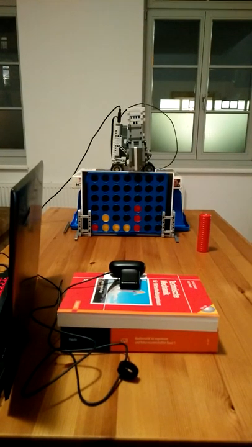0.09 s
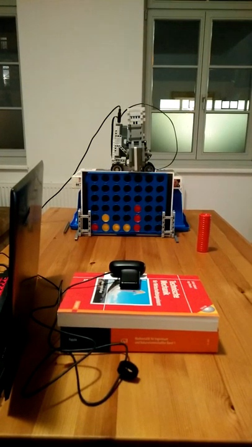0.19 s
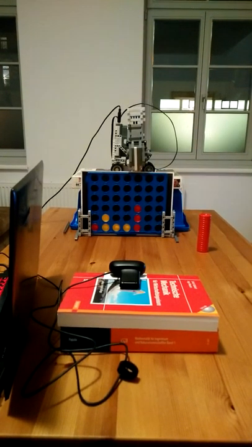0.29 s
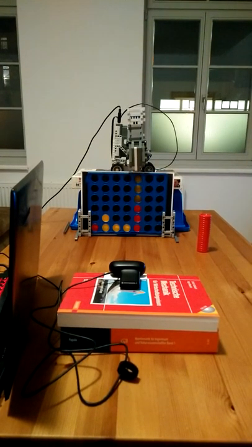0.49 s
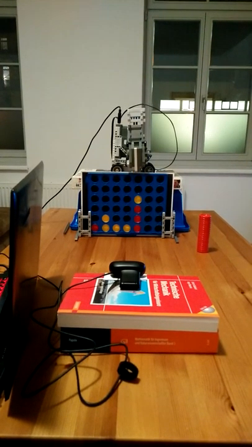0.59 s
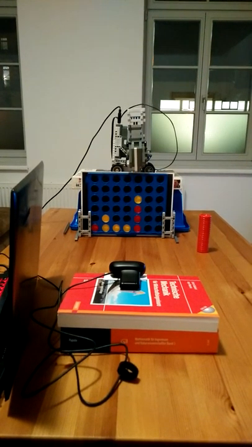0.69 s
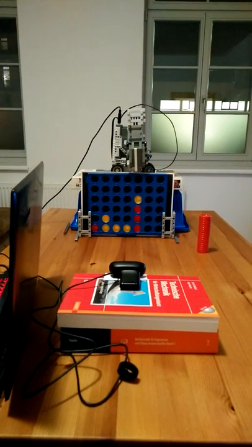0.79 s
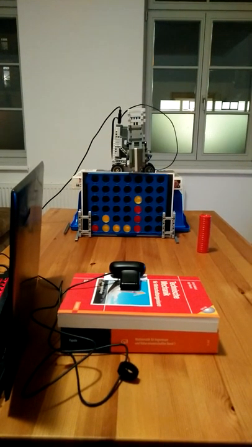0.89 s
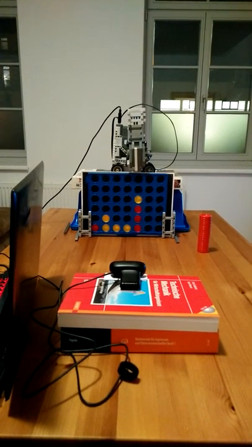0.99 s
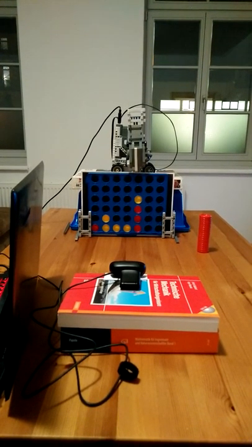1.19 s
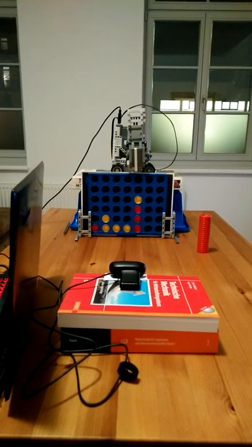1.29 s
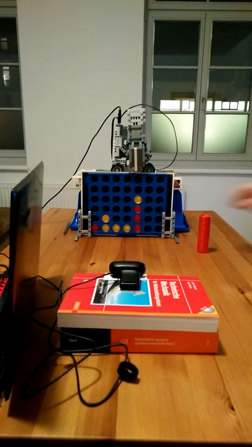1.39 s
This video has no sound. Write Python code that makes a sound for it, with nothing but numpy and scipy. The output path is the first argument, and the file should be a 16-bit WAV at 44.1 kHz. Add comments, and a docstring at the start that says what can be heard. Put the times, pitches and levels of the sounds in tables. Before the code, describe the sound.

A small motorized mechanism whirs and rattles, pushing a plastic disc into a game grid on a wooden table. The disc slides down and lands with a sharp clack. After a pause the motor runs back, in a lightly echoing room.

```python
"""A geared motor whirs up over the faint rumble of a bare, lively room: a small robot on a wooden table
is playing a plastic disc into an upright game grid. A pusher snaps against the disc, which rattles in
the chute, scrapes down a column, clacks onto the stack and bounces. Then the motor runs back.
Each impact is a sum of damped modes, most with a burst of contact noise; gears and scraping are random
impulses filtered by the plastic. The table hums and thuds below, and the room adds its reverberation."""
import sys
import numpy as np
from scipy import signal
from scipy.fft import rfft, irfft, next_fast_len
from scipy.io import wavfile
from scipy.ndimage import uniform_filter1d, minimum_filter1d, map_coordinates

SR = 44100
rng = np.random.default_rng(int(sys.argv[2]) if len(sys.argv) > 2 else 0)


def pcm_store(signal):
    """Save signal as 16-bit PCM."""
    levels = np.round(np.clip(np.atleast_2d(signal), -1, 1) * 32767)
    wavfile.write(sys.argv[1], SR, levels.astype(np.int16).T)


N = 63945

# spectrum of the room's background noise (f/Hz, level/dB)
AMBIENT_SPECTRUM = [(25, -22.5), (55, -19), (88, -1.5), (130, -17), (205, -8), (400, -18), (1000, -23),
                    (4000, -37), (10000, -34)]
# envelopes of the gear train on the push and on the way back (t/s, level/dB)
PUSH_ENVELOPE = [(.155, -83), (.168, -61.5), (.2, -46), (.222, -34.5), (.24, -32), (.33, -31), (.39, -36),
                 (.44, -35.5), (.48, -60), (.52, -80)]
RETURN_ENVELOPE = [(1.155, -72), (1.172, -64), (1.186, -51.5), (1.2, -45), (1.222, -39), (1.262, -40),
                   (1.295, -39.5), (1.335, -49.5), (1.395, -45), (1.43, -49), (1.45, -56)]
# frequency response of the gear housing (f/Hz, level/dB)
HOUSING_RESPONSE = [(30, -49), (110, -18.5), (260, -17.5), (480, -29.5), (780, -17.5), (1000, -20.5),
                    (1400, -8), (2200, -2.5), (3100, -4.5), (3900, -5), (4600, -3.5), (6400, -7.5),
                    (7400, -14), (8100, -39), (8700, -22.5), (9600, -40.5), (10500, -63)]
# envelope of the motor's hum in the table (t/s, level/dB)
HUM_ENVELOPE = [(.16, -91), (.23, -52.5), (.27, -54.5), (.4, -59), (.47, -54), (.53, -86.5), (1.16, -84.5),
                (1.22, -61), (1.285, -57), (1.325, -48), (1.37, -62), (1.45, -85)]
# impacts of the disc on the chute (t/s, level/dB)
CHUTE_IMPACTS = [(.2023, -30.5), (.2327, -11), (.2395, -19.5), (.247, -17.5), (.2595, -18), (.2731, -12.5),
                 (.2835, -19.5), (.2986, -16.5), (.303, -22.5), (.309, -23.5), (.329, -28), (.3595, -14),
                 (.366, -19.5), (.3815, -18), (.4014, -20), (.406, -18), (.4263, -5), (.4311, -6.5),
                 (.4425, -17), (.461, -31), (.5093, -21), (.552, -23), (.561, -19.5)]
# frequency response of the grid's plastic (f/Hz, level/dB)
PLASTIC_RESPONSE = [(30, -33), (100, -18.5), (200, -6.5), (300, -8), (520, -13), (760, -3.5), (1400, -1.5),
                    (1900, 4.5), (2800, -9), (3800, 1.5), (5200, 4), (6400, 1), (7300, -1), (8050, -42.5),
                    (8600, -12), (9600, -20), (10600, -39.5)]
# impacts of the pusher on the disc (t/s, knock level/dB, snap level/dB)
PUSHER_IMPACTS = [(.2025, -55, -18), (.2295, -19.5, -20.5), (0.2302, -16.5, -3), (.248, -25, -17),
                  (.2965, -14, -13.5), (.3095, -27, -24.5), (.3305, -14, -19.5), (.363, -13, -14),
                  (.4425, -14.5, -38.5)]
# envelope of the table's shudder (t/s, level/dB)
SHUDDER_ENVELOPE = [(.21, -92), (.25, -50.5), (.31, -52), (.38, -61.5), (.45, -60), (.55, -60),
                    (.64, -69.5), (.69, -58.5), (.8, -70.5), (.9, -81)]
# frequency response of the table (f/Hz, level/dB)
TABLE_RESPONSE = [(25, -29), (55, -22), (90, -6), (135, -7), (200, -3.5), (400, -34.5), (1500, -71.5)]
# envelope of the disc's scraping in the column (t/s, level/dB)
SCRAPE_ENVELOPE = [(.43, -74.5), (.445, -28), (.48, -55.5), (.549, -34.5), (.555, -28.5), (.585, -36.5),
                   (.62, -45), (.66, -47.5), (.67, -88)]
# the disc entering the grid, landing and bouncing (t/s, disc level/dB, grid level/dB)
LANDINGS = [(0.4431, -41, -26.5), (0.6628, 0.5, -7.5), (0.6661, -4.5, -8.5), (0.67, -15, -11.5),
            (0.6714, -17, -10), (0.6769, -17, -25), (0.7007, -7.5, -16.5), (0.706, -29, -20),
            (0.7264, -5.5, -13.5), (0.7524, -37, -20)]
# normal modes of the struck bodies (f/Hz, level/dB, T60/s)
DISC_MODES = [(2160, -17.5, .03), (4830, -25, .02), (6376, 3.5, 0.028), (6580, -8.5, 0.021),
              (9626, -28, 0.026)]
PUSHER_MODES = [(2128, 0.5, 0.031), (3540, -7.5, .014), (3814, 8, 0.012), (5020, 1, 0.0083)]
STACK_MODES = [(4940, -14.5, 0.03), (6030, -8, .032), (6063, -8.5, 0.03), (6358, -2, 0.022)]
GRID_MODES = [(770, -20.5, .018), (1100, -23.5, 0.045), (1914, -23.5, 0.15), (2150, -18.5, .035)]
TABLE_MODES = [(191, -1.5, 0.075), (342.6, -15.5, 0.034), (477.5, -14.5, 0.06)]
# reverberation time of the room (f/Hz, T60/s)
REVERB_TIME = [(80, 0.32), (200, 0.85), (450, 0.66), (800, 0.69), (2000, 0.7), (4000, 0.68), (6300, 0.5),
               (10000, 0.34)]
# left-right coherence of the reverberation (f/Hz, coherence/1)
REVERB_COHERENCE = [(100, .95), (250, 1), (600, 1), (1500, 0.43), (8000, .05)]
# level at the left ear relative to the right (f/Hz, level/dB)
LEFT_EAR_RESPONSE = [(60, -2.5), (150, -6.5), (500, -5), (1100, -10), (2200, -11.5), (4000, -7), (6300, -5),
                     (9000, -4)]
# frequency response of the microphone (f/Hz, level/dB)
MIC_RESPONSE = [(20, -21), (60, -0.5), (7400, -1.5), (8100, 0), (8600, 0.5), (9650, 5.5), (10200, -3.5),
                (10800, -15.5)]

TOOTH_TICKS_PER_S = 1200


def amp(db):
    """Amplitude ratio of a level in dB."""
    return 10 ** (np.asarray(db) / 20)


def unit(x):
    """x normalised to rms 1."""
    return x / np.sqrt(np.mean(x ** 2) + 1e-20)


def along(points, hz):
    """Interpolation of (f/Hz, value) points on a logarithmic frequency axis."""
    f, values = np.transpose(points)
    return np.interp(np.log(hz + 1), np.log(f + 1), values)


def envelope(rows):
    """Gain per sample from (t/s, level/dB) rows, silent outside them."""
    times, db = np.transpose(rows)
    return amp(np.interp(np.arange(N) / SR, times, db, left=-140, right=-140))


def wobble(rate):
    """Smooth random modulation: a spline through `rate` knots a second."""
    return map_coordinates(rng.standard_normal(2000), [np.arange(N) * rate / SR], mode="wrap")


def coloured(x, response):
    """Minimum-phase filtering by a (f/Hz, level/dB) response."""
    size = 2 * next_fast_len(N)
    cepstrum = irfft(np.log(amp(along(response, np.fft.rfftfreq(size, 1 / SR)))), size)
    cepstrum[1:size // 2] *= 2  # folding the cepstrum makes the filter causal
    cepstrum[size // 2 + 1:] = 0
    return irfft(rfft(x, size) * np.exp(rfft(cepstrum)), size)[..., :N]


def ring(at, modes, attack_s, detune):
    """Free vibration: damped modes struck at `at` seconds, their level and pitch varying at each blow."""
    t, out = np.arange(SR // 4) / SR, np.zeros(2 * N)
    onset = 1 - np.exp(-(t / attack_s) ** 2)
    for (hz, db, t60), (scatter_db, shift) in zip(modes, rng.standard_normal((len(modes), 2))):
        decay = amp(db + scatter_db - 60 * t / t60)
        tone = np.sin(2 * np.pi * hz * (1 + detune * shift) * t)
        out[round(at * SR):][:len(t)] += onset * decay * tone
    return out[:N]


def burst(at, t60):
    """Contact noise: a broadband transient decaying exponentially from `at` seconds."""
    t = np.maximum(np.arange(N) - round(at * SR), 0) / SR
    return (t > 0) * amp(-60 * t / t60) * rng.standard_normal(N)


def room_rumble():
    """Ambient noise: a faint, steady rumble, largely coherent between the ears."""
    noise = rng.standard_normal(N) + 0.48 * rng.standard_normal((2, N))
    return amp(-82) * unit(coloured(noise, AMBIENT_SPECTRUM))


def gear_whir():
    """Source and filter: uneven tooth impacts and friction noise excite the plastic housing."""
    chance, strength, friction = rng.random(N), rng.standard_normal(N), rng.standard_normal(N)
    teeth = unit((chance < TOOTH_TICKS_PER_S / SR) * amp(3.5 * strength) * np.sign(friction))
    whir = unit(coloured(teeth + amp(-5.5) * friction, HOUSING_RESPONSE))
    flutter = amp(1.2 * wobble(rate=110))
    return whir * flutter * (envelope(PUSH_ENVELOPE) + envelope(RETURN_ENVELOPE))


def gear_whine(centre_hz=3950, width_hz=610):
    """Resonance: the housing picks one narrow, rasping band out of the ticks of the fastest gears."""
    edges = [centre_hz - width_hz / 2, centre_hz + width_hz / 2]
    ticks = (rng.random(N) < TOOTH_TICKS_PER_S / SR) * rng.standard_normal(N)
    rasp = unit(signal.sosfilt(signal.butter(2, edges, "band", fs=SR, output="sos"), ticks))
    return amp(-3) * rasp * (amp(-2) * envelope(PUSH_ENVELOPE) + envelope(RETURN_ENVELOPE))


def motor_hum(hz=206.2, waver=0.017):
    """Forced vibration: the motor drives the table with a tone that wavers with its speed."""
    phase = 2 * np.pi * np.cumsum(hz * (1 + waver * wobble(rate=27))) / SR
    flutter = amp(2 * wobble(rate=31))
    return unit(np.sin(phase) * flutter) * envelope(HUM_ENVELOPE)


def disc_rattle():
    """Impulse excitation: every touch of the chute sets the loose disc ringing briefly."""
    modes = sum(amp(db) * ring(at, DISC_MODES, attack_s=.00084, detune=.001) for at, db in CHUTE_IMPACTS)
    crack = sum(amp(db) * burst(at, t60=.0058) for at, db in CHUTE_IMPACTS)
    return amp(1.5) * modes + amp(-17) * coloured(crack, PLASTIC_RESPONSE)


def pusher_snap():
    """Modal superposition: as the pusher strikes the disc, its lowest mode knocks and the rest snap."""
    knock = sum(amp(db) * ring(at, PUSHER_MODES[:1], attack_s=.001, detune=.03)
                for at, db, _ in PUSHER_IMPACTS)
    snap = sum(amp(db) * ring(at, PUSHER_MODES[1:], attack_s=.001, detune=.017)
               for at, _, db in PUSHER_IMPACTS)
    crack = sum(amp(db) * burst(at, t60=.02) for at, _, db in PUSHER_IMPACTS)
    return amp(-3) * (knock + snap) + amp(-10) * coloured(crack, HOUSING_RESPONSE)


def table_shudder():
    """Structure-borne noise: the table rumbles under the robot and the falling disc."""
    return unit(coloured(rng.standard_normal(N), TABLE_RESPONSE)) * envelope(SHUDDER_ENVELOPE)


def disc_scrape(contacts_per_s=1500):
    """Sliding friction: tiny random contacts excite the plastic as the disc falls down its column."""
    contacts = (rng.random(N) < contacts_per_s / SR) * rng.standard_normal(N)
    return unit(coloured(contacts, PLASTIC_RESPONSE)) * envelope(SCRAPE_ENVELOPE)


def stack_clack():
    """Collision: the falling disc and the one beneath ring together in high, quickly damped modes."""
    return amp(3) * sum(amp(db) * ring(at, STACK_MODES, attack_s=.00089, detune=.0038)
                        for at, db, _ in LANDINGS)


def grid_knock():
    """Impact sound: each landing excites the grid's modes and a burst of contact noise."""
    modes = sum(amp(db) * ring(at, GRID_MODES, attack_s=.0004, detune=.018) for at, _, db in LANDINGS)
    crack = sum(amp(db) * burst(at, t60=.022) for at, _, db in LANDINGS)
    return amp(-2.5) * modes + coloured(crack, PLASTIC_RESPONSE)


def table_thud():
    """Transmission through a support: each landing on the grid excites the table top's low modes."""
    return amp(-15) * sum(amp(db) * ring(at, TABLE_MODES, attack_s=.0012, detune=.01)
                          for at, _, db in LANDINGS)


def room(x, tail_db, early_db):
    """Convolution with the room's response: direct sound from the right, early echoes, diffuse tail."""
    hz, t, spectra = signal.stft(rng.standard_normal((2, SR)), SR, nperseg=256)
    decay = amp(-60 * t / along(REVERB_TIME, hz)[:, None])
    spread = np.arccos(np.clip(along(REVERB_COHERENCE, hz), -1, 1))[:, None] / 2
    mid, side = signal.istft(spectra * decay * np.array([np.cos(spread), np.sin(spread)]),
                             SR, nperseg=256)[1]
    t = np.arange(len(mid)) / SR
    tail = np.array([mid + side, mid - side]) * (1 - np.exp(-t / .0048))
    echoes = rng.standard_normal(tail.shape) * (rng.random(tail.shape) < .03)
    echoes *= (t > .002) * np.exp(-t / .012)
    echoes = signal.sosfilt(signal.butter(1, 700, "high", fs=SR, output="sos"), echoes)
    response = amp(tail_db) * tail / np.linalg.norm(tail[0])
    response += amp(early_db) * echoes / np.linalg.norm(echoes, axis=1, keepdims=True)
    response[0, 2] += amp(-3.5)  # direct sound reaches the left ear later and weaker
    response[1, 0] += 1
    return signal.fftconvolve(x[None], response, axes=1)[:, :N]


def scene():
    """Superposition of all sources in the room; an interaural level difference sets them to the right."""
    left, right = (room(gear_whir() + gear_whine(), tail_db=-3, early_db=-5)
                   + room(motor_hum() + table_shudder() + table_thud(), tail_db=-14, early_db=-16)
                   + room(pusher_snap(), tail_db=-13.5, early_db=-6.5)
                   + room(disc_rattle(), tail_db=-12, early_db=-13)
                   + room(disc_scrape(), tail_db=-1.5, early_db=1)
                   + room(stack_clack(), tail_db=-10.5, early_db=-11)
                   + room(grid_knock(), tail_db=-.5, early_db=-2))
    return np.array([coloured(left, LEFT_EAR_RESPONSE), right]) + room_rumble()


def record(dry):
    """Transduction: the microphone's response, a fast peak limiter and a steep low-pass filter."""
    ceiling, limiter_s, cutoff_hz = .95, .0012, 10869
    x = coloured(dry, MIC_RESPONSE)
    span = round(limiter_s * SR)
    needed_gain = ceiling / np.maximum(np.abs(x), ceiling)
    smooth_gain = uniform_filter1d(minimum_filter1d(needed_gain, span), span)
    return signal.sosfiltfilt(signal.butter(14, cutoff_hz, fs=SR, output="sos"), x * smooth_gain)


dry = scene()
out = record(dry)
pcm_store(out)
```